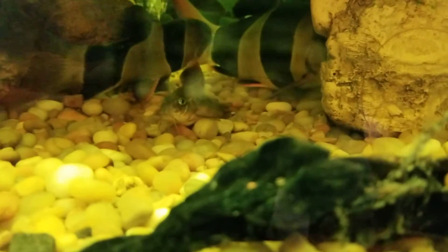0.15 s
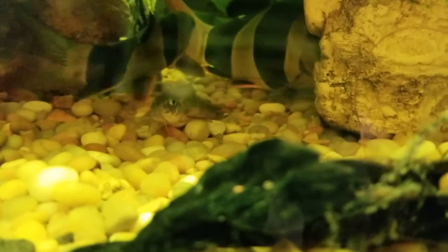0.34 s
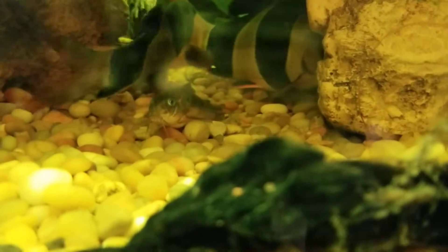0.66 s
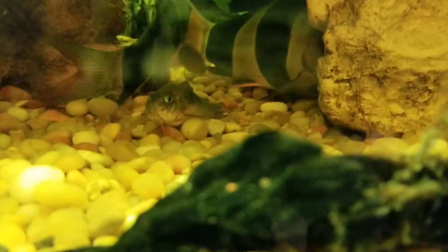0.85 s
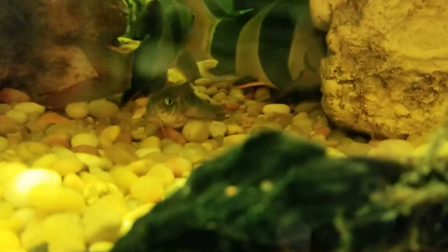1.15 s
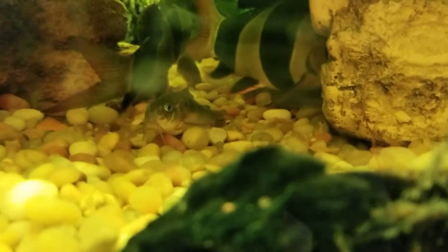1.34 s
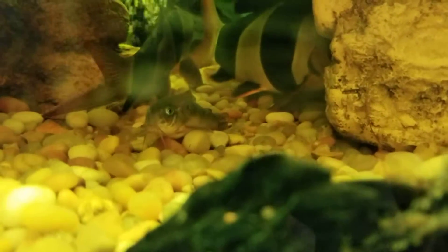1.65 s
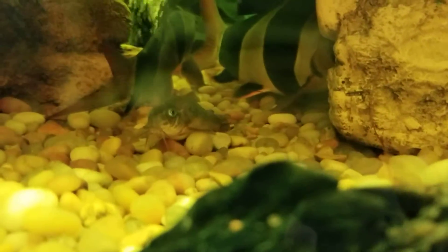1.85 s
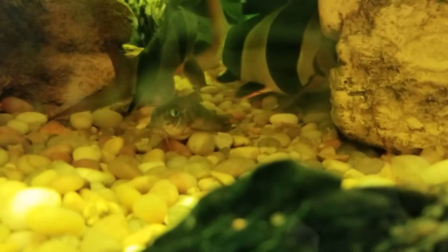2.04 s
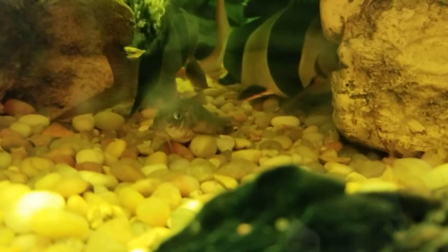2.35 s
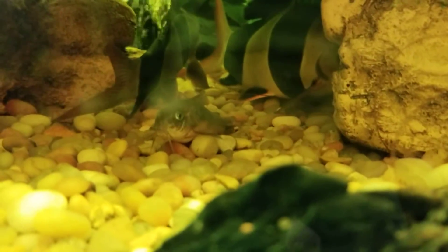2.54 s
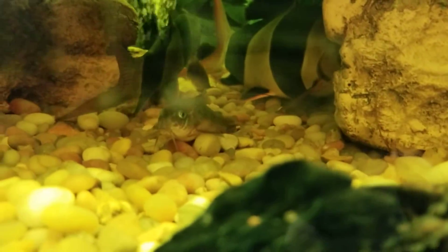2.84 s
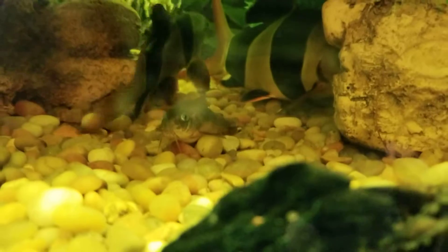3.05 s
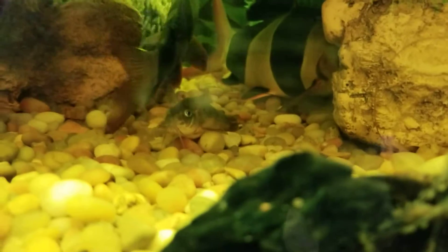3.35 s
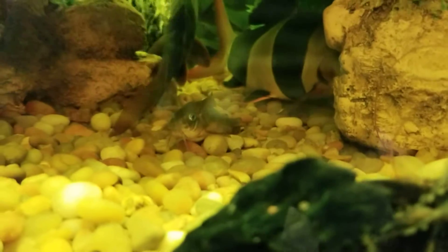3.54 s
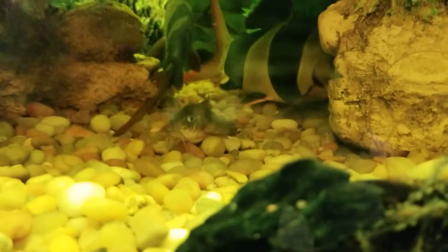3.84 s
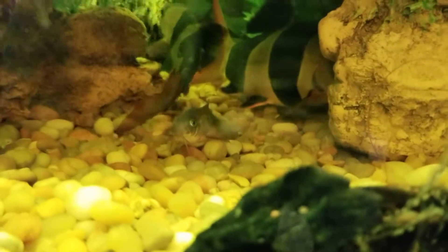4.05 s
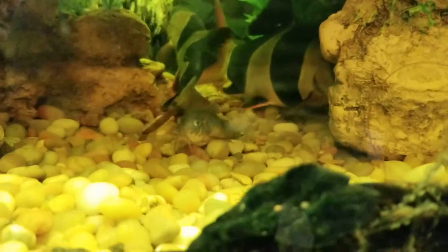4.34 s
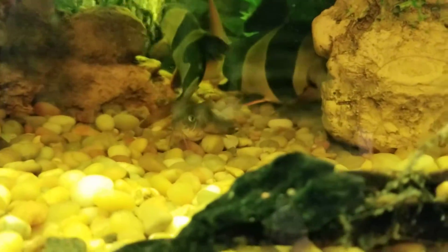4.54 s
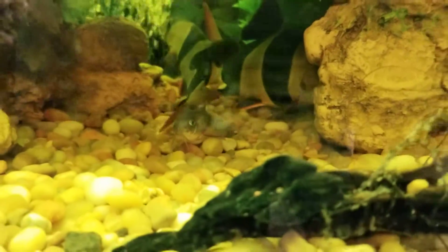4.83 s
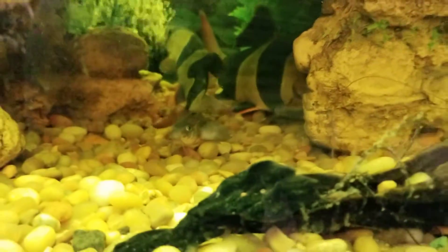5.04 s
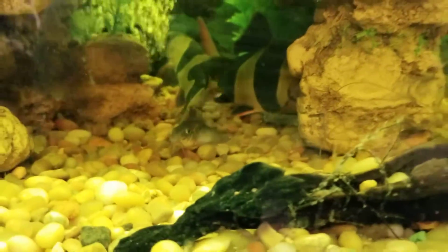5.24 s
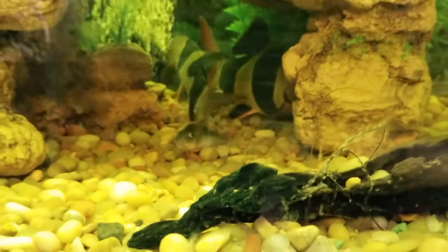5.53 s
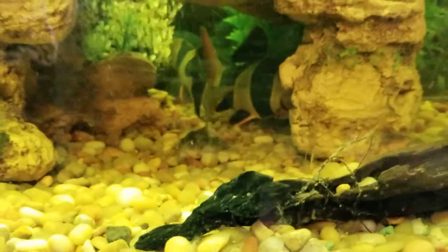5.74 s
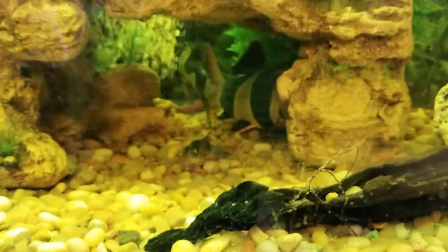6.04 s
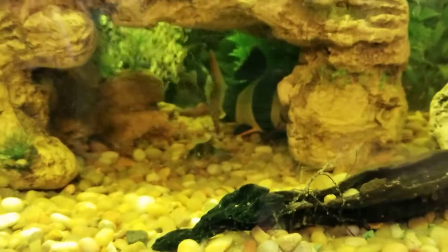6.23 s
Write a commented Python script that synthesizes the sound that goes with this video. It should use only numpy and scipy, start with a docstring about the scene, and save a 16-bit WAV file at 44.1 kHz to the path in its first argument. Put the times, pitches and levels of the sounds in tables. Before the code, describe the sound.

A low aquarium pump hum with a rough, raspy mid-range buzz and soft even hiss runs steadily in a quiet room.

```python
"""A quiet room, where aquarium equipment runs beside a hand-held camera.
A mains-driven pump hums in harmonics; its armature buzzes high up, with one clean line as a whine.
Its housing rattles in bursts, made of noisy knocks that ring resonances.
The camera case ticks and a few drips sound faintly, both as short decaying waves.
Shaped random noise makes the rumble and hiss of the room behind them."""
import sys
import numpy as np
from scipy import signal
from scipy.fft import rfft, irfft
from scipy.io import wavfile
from scipy.ndimage import uniform_filter1d

SR = 44100
rng = np.random.default_rng(int(sys.argv[2]) if len(sys.argv) > 2 else 0)


def dump(signal):
    """Clip the signal to [-1, 1] and save it as 16-bit WAV at the path in sys.argv[1]."""
    limited = np.clip(np.atleast_2d(signal).T, -1, 1)
    pcm = np.round(limited * 32767).astype(np.int16)
    wavfile.write(sys.argv[1], SR, pcm)


def amplitude_ratio(level_db):
    """Convert a level in decibels to the matching linear amplitude (field) ratio."""
    exponent = np.asarray(level_db, float) / 20
    return 10 ** exponent


N = 281602  # length in samples

# Slow rise and fall of the room noise and of the second and third hum lines.
# Each row: time in seconds, change of the bass in dB, change of the treble in dB.
SLOW_SWELL = [(0, -1, -1), (.5, -1.5, -1), (1.6, -0.5, -1), (1.75, 1.5, 1.5), (3.4, 0.5, 1), (4.6, 1, 1),
              (5.2, -1.5, 0), (6.39, -2, 1)]


def evened(x):
    """Scale a sound to an rms of 1, over both channels together."""
    return x / np.sqrt(np.mean(x ** 2) + 1e-20)


def read(points, hz):
    """Read a table of (Hz, value) between its points, along a logarithmic pitch scale."""
    table_hz, value = np.transpose(points)
    return np.interp(np.log(hz + 1), np.log(table_hz + 1), value)


def curve(rows, column):
    """Read one column of a time table at every sample."""
    return np.interp(np.arange(N) / SR, [row[0] for row in rows], [row[column] for row in rows])


def wander(top_hz, count):
    """Slow random curves of rms about 1: sums of sines of random phase, up to top_hz."""
    t = np.arange(0, N + 256, 256) / SR
    hz = top_hz * np.geomspace(.05, 1, 12)
    cycles = hz[:, None] * t + rng.random((count, 12, 1))
    slow = np.sin(2 * np.pi * cycles).sum(1) / np.sqrt(6)
    return np.array([np.interp(np.arange(N) / SR, t, one) for one in slow])


def resonate(x, hz, width):
    """A two-pole resonance: passes its own pitch at gain 1 and weakens the rest."""
    return signal.lfilter(*signal.iirpeak(hz, hz / width, SR), x)


def burst(hz, length, rise=0):
    """A short wave under a bell shape; its pitch climbs by the share rise in each length."""
    t = np.arange(-400, 400) / SR
    bell = np.exp(-(2 * t / length) ** 2)
    return bell * np.cos(2 * np.pi * hz * t * (1 + rise * t / length / 2))


def mains():
    """Phase of the mains cycle in radians."""
    mains_hz = 59.983
    return 2 * np.pi * mains_hz * np.arange(N) / SR


def hum():
    """Harmonics of the pump stroke, spread a little in time; the right port hears them slightly late."""
    # Low hum lines. Each row: multiple of the mains, level in dB rms before swell and waver.
    hum_lines = [(1, -41.4), (2, -45.2), (3, -53.2), (4, -71.5), (5, -65.6), (7, -60.3), (8, -65.9),
                 (9, -66.7), (17, -79.3), (22, -72.7)]
    # Swell of the lowest line. Each row: time in seconds, change in dB.
    lowest_swell = [(0, -3.5), (1, 1), (1.6, -1.5), (2.4, 3), (3.1, -3), (3.6, 3), (4.3, -1), (5.2, 1),
                    (5.9, -2.5), (6.39, -1)]
    waver_db = 0.7
    lag, spread = 0.085, 0.9  # radians: of the mains cycle, and per squared multiple
    port_phase = mains() - lag * np.array([[0], [1]])
    out = np.zeros((2, N))
    for (k, db), waver in zip(hum_lines, wander(6, count=len(hum_lines))):
        swell_db = 0
        if k <= 3:
            swell_db = curve(lowest_swell if k == 1 else SLOW_SWELL, column=1)
        line = np.cos(k * port_phase + spread * k ** 2)
        out += amplitude_ratio(db + swell_db + waver_db * waver) * line
    return -np.sqrt(2) * out  # a sine of rms 1 peaks at the root of 2


def buzz():
    """Short waves from the armature: each line fades and slides at each port as the reflections shift."""
    # High buzz lines. Each row: multiple of the mains, level in dB rms before fades, swell and balance.
    buzz_lines = [(77, -80.9), (78, -86.8), (79, -86.3), (80, -82.6), (81, -82.8), (82, -77.5), (83, -77.3),
                  (84, -79.2), (85, -79.7), (87, -87.5), (88, -92.9), (89, -80.5), (90, -87.1), (91, -81.0),
                  (92, -82.7), (93, -83.6), (94, -82.4), (95, -81.1), (96, -78.0), (97, -84.3), (98, -84.2),
                  (99, -83.9), (100, -80.4), (101, -81.6), (102, -85.4), (103, -89.3), (104, -82.5),
                  (105, -78.4), (106, -84.2), (107, -83.3), (108, -81.4), (109, -85.8), (110, -81.1),
                  (111, -82.2)]
    # Swell of the whole buzz. Each row: time in seconds, change in dB.
    buzz_swell = [(0, -1), (1.5, -1.5), (3.5, 1), (5, 0.5), (5.6, 3), (6.39, 1)]
    fade_db, slide = 2.2, 1.2  # typical size of the random fade, and of the phase slide in radians
    lean_db = -6  # left minus right
    out = np.zeros((2, N))
    for k, db in buzz_lines:
        chance = wander(0.716, count=4)
        start = 2 * np.pi * rng.random((2, 1))
        line = np.cos(k * mains() + start + slide * chance[2:])
        out += amplitude_ratio(db + fade_db * chance[:2]) * line
    balance_db = lean_db * np.array([[.5], [-.5]])
    return np.sqrt(2) * out * amplitude_ratio(curve(buzz_swell, column=1) + balance_db)


def whine():
    """One clean line at a mains multiple: steady at the left port, fading and returning at the right."""
    # Each row: time in seconds, right level in dB rms, right lead in radians.
    right_whine = [(0, -67, 1.0), (.7, -73, 1.5), (1.2, -81, 2.9), (1.7, -86, 2.4), (2.5, -81, 1.5),
                   (3.7, -66.5, .7), (4.8, -68.5, .3), (5.2, -71, -1.2), (6.39, -66.5, -1.4)]
    multiple, left_db = 86, -71.5  # the left level is in dB rms
    phase = multiple * mains() + np.array([[0], [1]]) * curve(right_whine, column=2)
    level_db = [np.full(N, left_db), curve(right_whine, column=1)]
    return np.sqrt(2) * amplitude_ratio(level_db) * np.cos(phase)


def rattle():
    """Noisy knocks twice a cycle, one harder, ring the housing; bursts start suddenly and die away."""
    # Housing resonances. Each row: pitch in Hz, width in Hz before widening, relative level in dB.
    housing = [(1026.5, 32, -12.5), (1286, 62, -5.5), (1519, 54, -15), (1714, 30, -3.5), (1831.5, 66, -4),
               (1860, 26, -16), (1894, 30, -11.5), (2002, 50, -12.5), (2088, 24, -19), (3150, 2600, -13),
               (3654, 165, -16)]
    # Each row: time in seconds, overall gain in dB, extra gain of the strongest resonance in dB.
    rattle_level = [(0, -59, -3), (.5, -64, 4), (.8, -59.5, 2.5), (2.1, -60.5, 3), (3.3, -60, 3.5),
                    (4.2, -57.5, -2.5), (4.9, -60.5, 2), (5.2, -61.5, -2), (6.39, -63, 1.5)]
    sharp, uneven = 1.5, .8  # how pointed the knocks are, and how much they differ
    bursts_per_s, burst_s, steady = 40, .02, 2.2  # average rate, die-away in seconds, constant part
    shared = 0.84  # share of the noise that both ports hear
    widening = 1.09
    knocks = np.exp(sharp * np.cos(2 * mains()) + uneven * np.cos(mains()))
    starts = (rng.random(N) < bursts_per_s / SR) * rng.uniform(0.15, 1, N)
    dying = signal.lfilter([1], [1, -np.exp(-1 / (burst_s * SR))], starts)
    bursts = steady + evened(dying)
    both, left, right = rng.standard_normal((3, N))
    common = np.array([both, np.roll(both, -3)])  # three samples earlier at the right
    noise = shared * common + np.sqrt(1 - shared ** 2) * np.array([left, right])
    drive = noise * knocks * bursts
    strongest = max(row[2] for row in housing)
    out = np.zeros((2, N))
    for hz, width, db in housing:
        once = resonate(drive, hz, widening * width)
        ring = evened(resonate(once, hz, widening * width))
        extra_db = curve(rattle_level, column=2) if db == strongest else 0
        out += amplitude_ratio(db + extra_db) * ring
    return amplitude_ratio(curve(rattle_level, column=1)) * out


def ticks():
    """The camera case rings for a few cycles with a brighter spark; bursts tend to grow to the last tick."""
    # Each row: time of the last tick in seconds, number of ticks, gap in seconds, level in dB,
    # left minus right in dB, treble level in dB.
    tick_bursts = [(.8788, 5, .00078, -42, 28, -11), (.8819, 1, 0, -49, 11, -19),
                   (1.2028, 3, .0031, -48, 24, -16), (5.7448, 2, .0055, -48, -16, -6)]
    # What a tick rings with; the last two rows are its treble.
    # Each row: pitch in Hz, length in seconds, level in dB.
    case_rings = [(1800, .001, -15), (3000, .0006, -18), (5300, .0005, -1), (11500, .0006, -3),
                  (14000, .0004, -3)]
    growth_db, scatter_db, gap_jitter = 1.5, 2, .25  # the jitter is a share of the gap
    rings = [amplitude_ratio(db) * burst(hz, length) for hz, length, db in case_rings]
    out = np.zeros((2, N))
    for s, count, gap, db, pan_db, treble_db in tick_bursts:
        tick = sum(rings[:-2]) + amplitude_ratio(treble_db) * sum(rings[-2:])
        balance_db = np.array([[.5], [-.5]]) * pan_db
        for back, (late, odd) in enumerate(rng.uniform(-1, 1, (count, 2))):
            if back == 0:  # the last tick has no jitter or scatter
                late, odd = 0, 0
            middle = s - gap * (back + gap_jitter * late)
            at = round(middle * SR) - len(tick) // 2
            level_db = db - growth_db * back + scatter_db * odd
            out[:, at:at + len(tick)] += amplitude_ratio(level_db + balance_db) * tick
    return out


def drips():
    """Tiny bubbles ring for a few milliseconds with a rising pitch."""
    # Each row: time in seconds, peak level in dB before the balance, pitch in Hz.
    drip_list = [(.1, -66, 5750), (.13, -64, 6050), (.16, -60, 6050), (.219, -58, 5900), (.24, -66, 5750),
                 (.322, -63, 5800), (.365, -65, 6100)]
    out = np.zeros(N)
    for s, db, hz in drip_list:
        drip = burst(hz, .008, rise=.04)
        at = round(s * SR) - len(drip) // 4
        out[at:at + len(drip)] += amplitude_ratio(db) * drip
    return out * amplitude_ratio([[-3], [1.5]])  # left, right


def room():
    """Random short-time spectra with drifting patches and a treble flicker; rumble and hiss swell apart."""
    # Color of the noise. Each row: pitch in Hz, relative level in dB per Hz.
    room_color = [(25, -15), (38, 1.5), (90, 1.5), (140, -4), (220, -3), (400, -10), (640, -10), (800, -17),
                  (1900, -19), (2300, -30), (3700, -29.5), (6600, -34.5), (7600, -45.5), (8200, -52.5),
                  (8700, -52.5), (9800, -49), (10200, -44), (13000, -42), (15700, -46.5)]
    # Room modes that lift the rumble. Each row: pitch in Hz, width in Hz, lift in dB.
    modes = [(159, 11, 2.5), (222, 13.3, 4.5), (254, 26, 1), (319, 7.3, 2.5), (371, 12, 1.5), (519, 26, 4),
             (560, 11, 2), (666, 58, 3.5), (745, 12, 4.5)]
    # Each row: pitch in Hz, likeness of left and right (1 same, 0 unrelated, -1 opposite).
    likeness = [(60, 0.83), (180, 0.92), (300, 0.86), (580, 0.86), (720, 0.24), (920, -0.087),
                (1500, -0.29), (2100, -0.19), (2500, 0.068), (3000, 0.014), (15000, 0.048)]
    # Each row: pitch in Hz, left minus right in dB.
    lean = [(60, 2.5), (180, 3), (420, .7), (570, 5), (720, -2.8), (920, 2.5), (1200, 0.2), (1500, -0.5),
            (1950, -4), (2500, 0), (5000, 0), (15000, 0)]
    level_db = -45  # rms of the whole noise
    patchy_db, flicker_db = 0.9, 1.4
    split_hz, smooth_hz = 820, 7000  # rumble gives way to hiss; the flicker weakens above
    frames, hz = N // 256 + 5, np.fft.rfftfreq(1024, 1 / SR)
    a, b, c, d, patches = rng.standard_normal((frames, 513, 5)).T
    flicker = evened(uniform_filter1d(rng.standard_normal(frames), 5))
    patches = evened(uniform_filter1d(uniform_filter1d(patches, 14, 0), 14, 1))
    high = (1 / (1 + (split_hz / (hz + 1)) ** 6))[:, None]
    flicker_share = high / (1 + (hz[:, None] / smooth_hz) ** 2)
    rumble_db, hiss_db = (np.resize(curve(SLOW_SWELL, column=k)[::256], frames) for k in (1, 2))
    field_db = patchy_db * patches + flicker_db * flicker * flicker_share
    field_db = field_db + (1 - high) * rumble_db + high * hiss_db
    spectra = np.array([a + 1j * b, c + 1j * d]) * amplitude_ratio(field_db)
    white = signal.istft(spectra, nperseg=1024, noverlap=768)[1][:, :N]
    # Color the two noises and mix them into the left and right ports.
    hz, (one, other) = np.fft.rfftfreq(N, 1 / SR), rfft(white)
    same = np.clip(read(likeness, hz), -1, 1)
    ports = np.array([one, same * one + np.sqrt(1 - same ** 2) * other])
    modes_db = sum(db * np.exp(-(2 * (hz - mode_hz) / width) ** 2 / 2) for mode_hz, width, db in modes)
    balance_db = np.outer([.5, -.5], read(lean, hz))
    ports *= amplitude_ratio(read(room_color, hz) + modes_db + balance_db)
    return amplitude_ratio(level_db) * evened(irfft(ports, N))


def scene():
    """Pump, camera, drips and room together, in stereo."""
    return hum() + buzz() + whine() + rattle() + ticks() + drips() + room()


def band_limit(x):
    """A steep low-pass at the top of the band."""
    return signal.sosfilt(signal.butter(12, 15750, fs=SR, output="sos"), x)


def record(dry):
    """Turn the finished mix into the sound that is saved."""
    return band_limit(dry)


dry = scene()
out = record(dry)
dump(out)
```